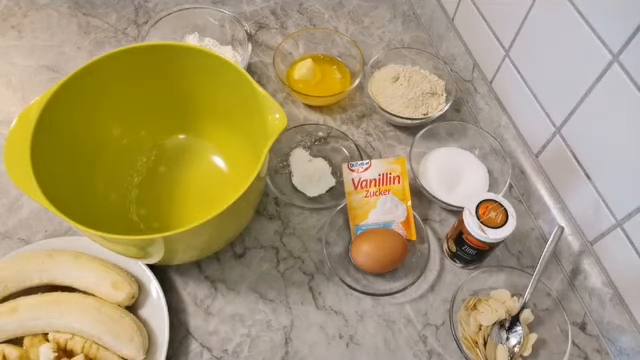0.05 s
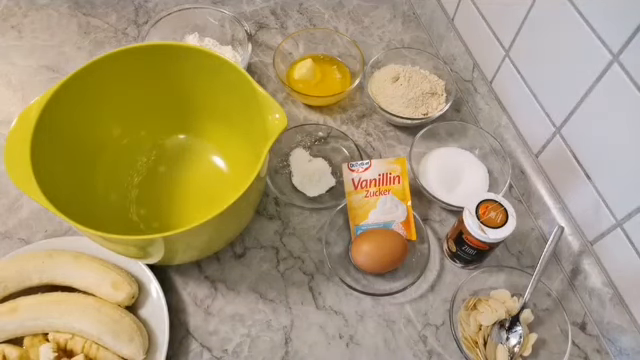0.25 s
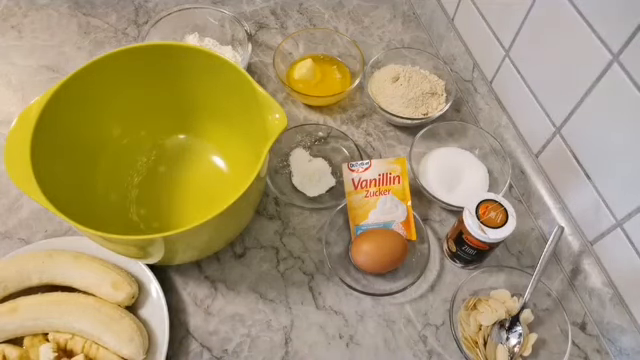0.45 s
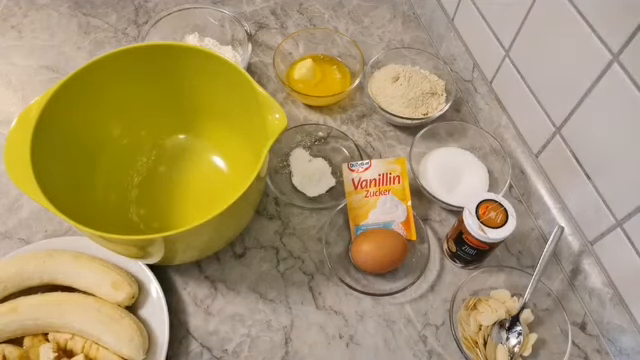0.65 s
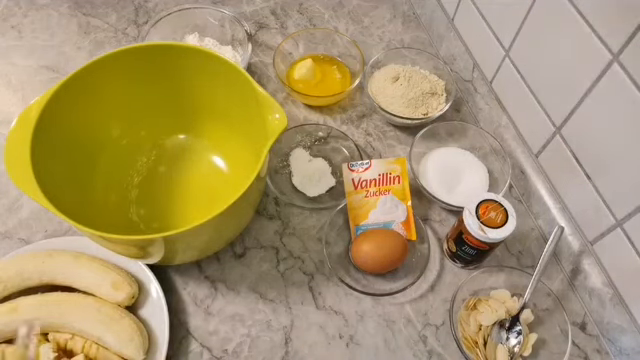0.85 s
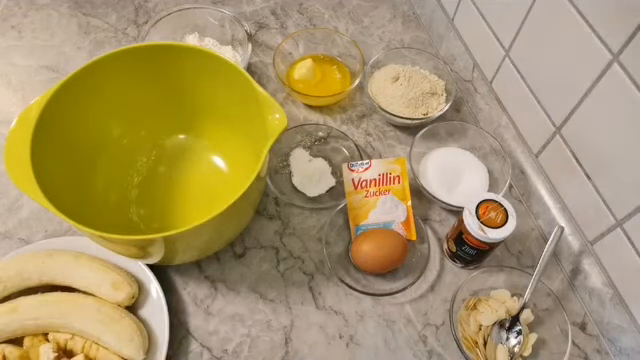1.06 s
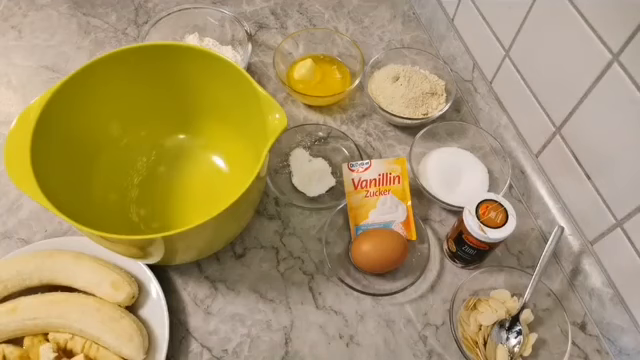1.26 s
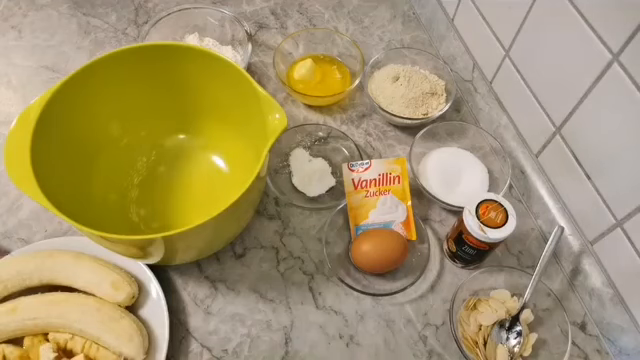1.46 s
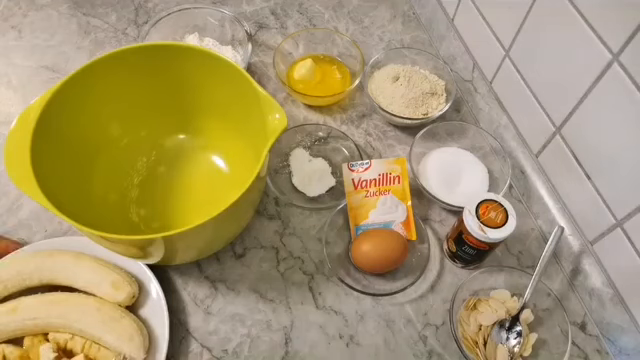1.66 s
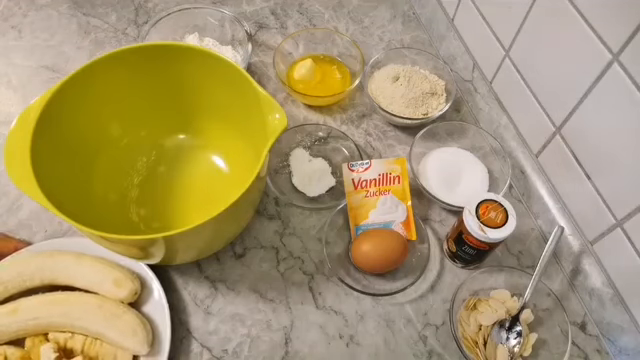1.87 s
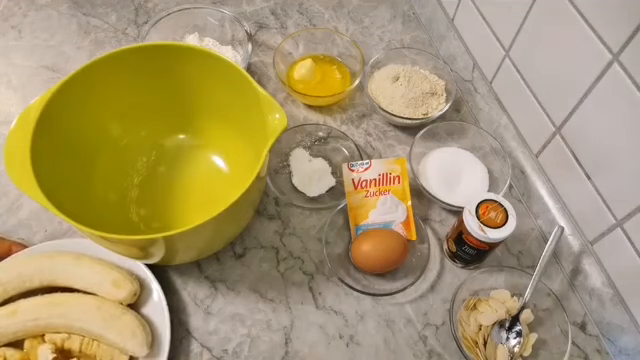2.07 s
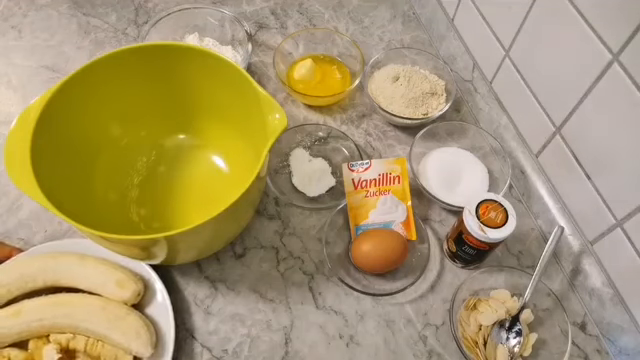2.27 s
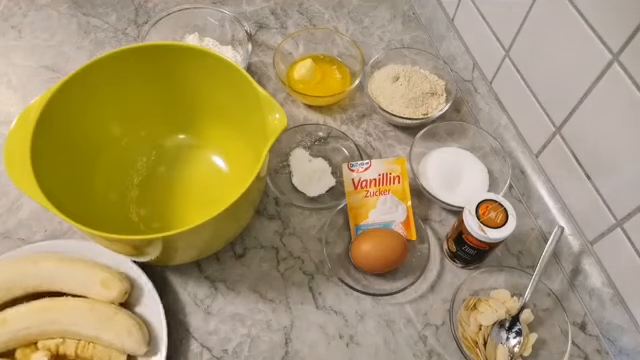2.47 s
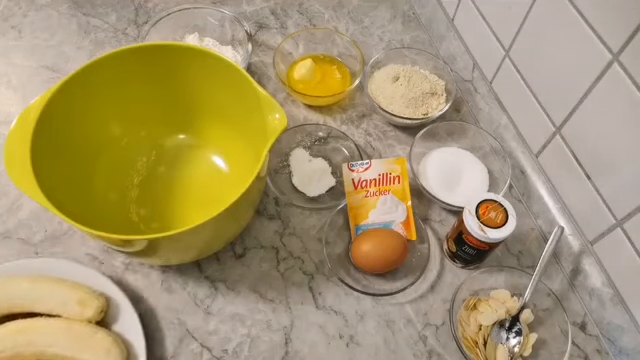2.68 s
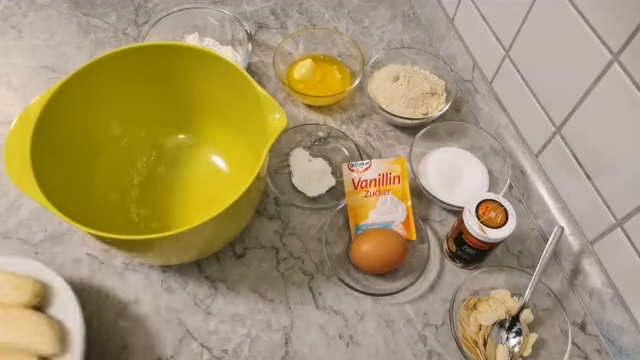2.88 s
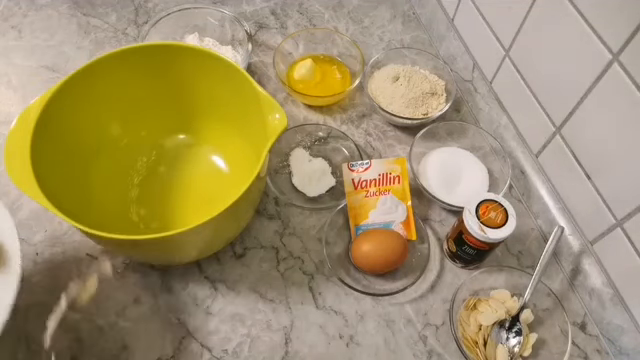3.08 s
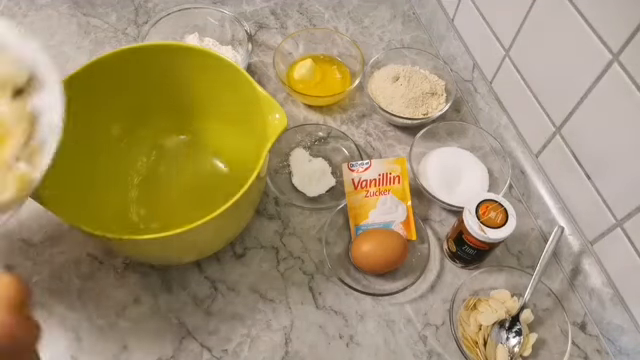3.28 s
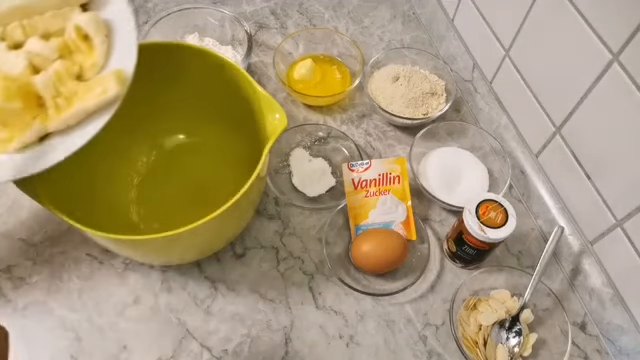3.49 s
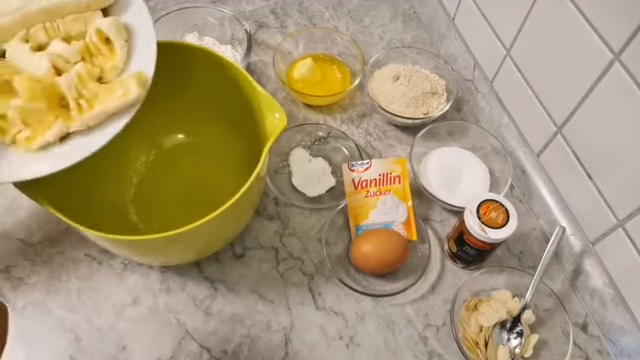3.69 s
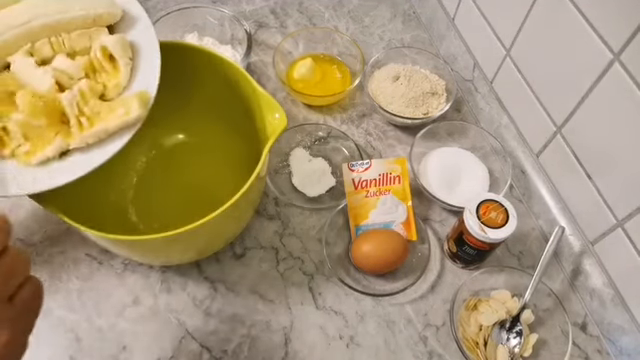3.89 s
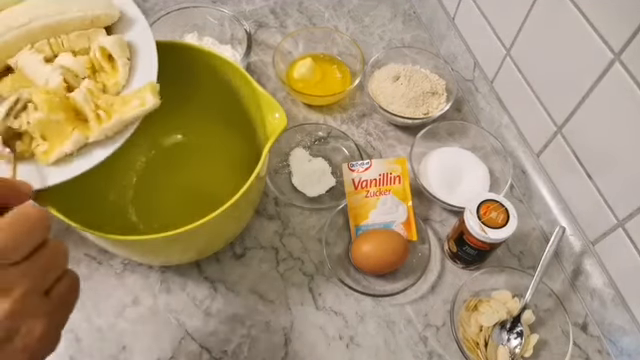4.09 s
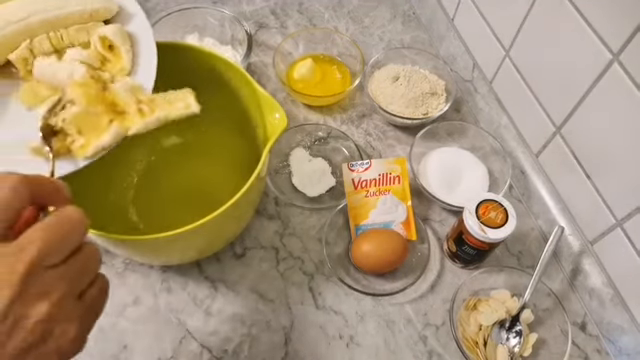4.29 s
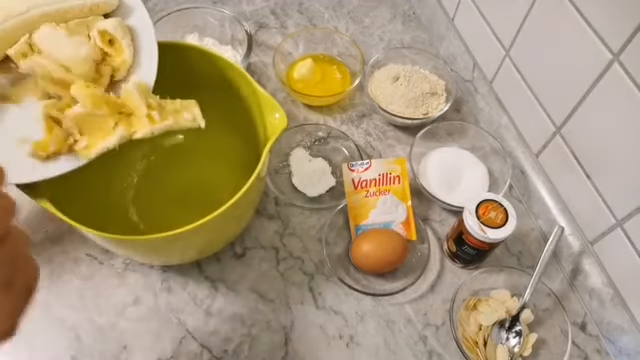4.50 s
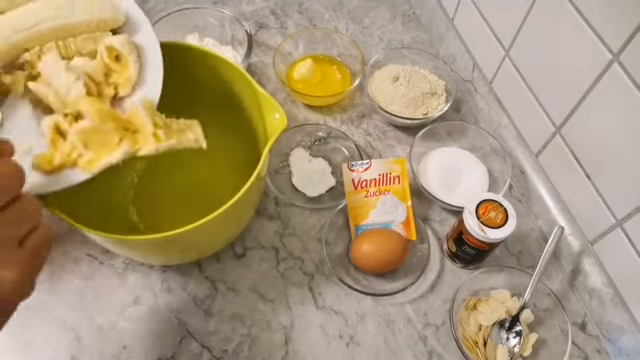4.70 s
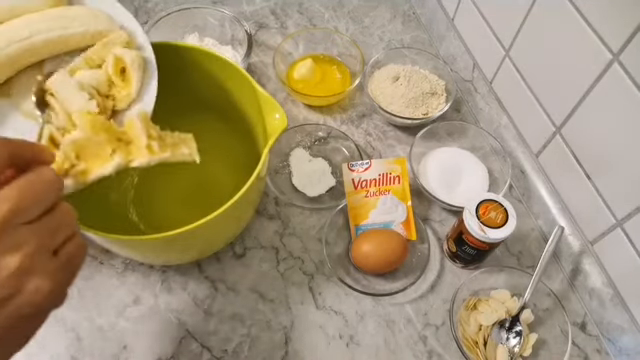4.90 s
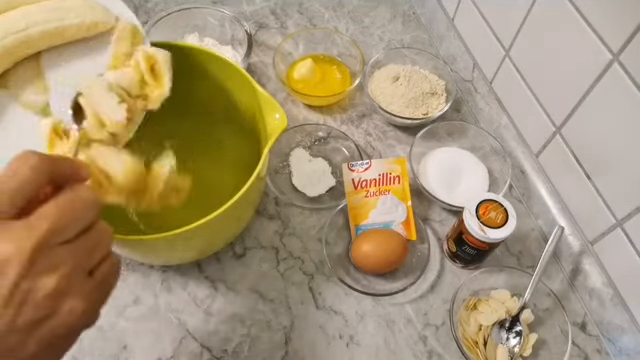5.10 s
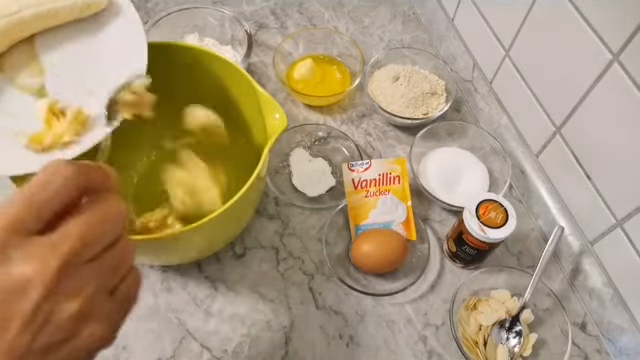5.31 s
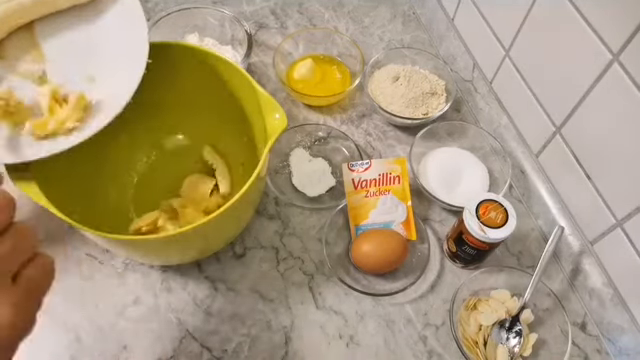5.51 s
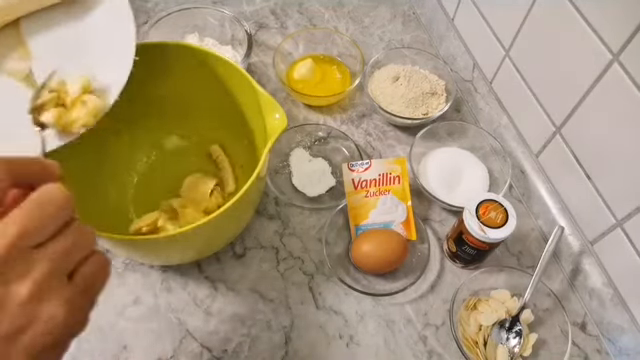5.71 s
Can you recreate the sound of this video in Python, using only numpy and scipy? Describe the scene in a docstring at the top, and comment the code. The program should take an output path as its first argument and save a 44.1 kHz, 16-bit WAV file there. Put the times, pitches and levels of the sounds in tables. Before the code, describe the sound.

In a quiet kitchen, hands brush a plate with faint dry rubbing and dull bumps. The plate then grates and knocks briefly over a stone counter and is lifted. After a near-silent gap come small sticky ticks of mashed banana, then a few close thuds into a hollow plastic bowl with a light fork tap. Close microphone, faint hiss, low rumble and weak hum, short room tail.

```python
"""Plate sliding and bumping on a stone counter, wet fork ticks and lumps thudding into a bowl in a quiet kitchen.
Rubbing is random stick-slip noise that excites the plate's modes; bumps are damped sines with a noise puff.
Sticky mashed banana lets go in short noise bursts. Each lump drives the modes of a plastic bowl with a force pulse.
A short room tail follows, over shaped noise for air and rumble, and an appliance hum of wavering tones.
"""
import sys
import numpy as np
from scipy import signal
from scipy.fft import rfft, irfft, next_fast_len
from scipy.io import wavfile
from scipy.ndimage import uniform_filter1d

SR = 44100
rng = np.random.default_rng(int(sys.argv[2]) if len(sys.argv) > 2 else 0)


def waveform_to_disk(signal):
    """Save audio, clipped to [-1, 1], as 16-bit WAV at the path in sys.argv[1]."""
    frames = np.transpose(np.atleast_2d(signal))
    scaled = np.clip(frames, -1, 1) * 32767
    samples = np.round(scaled).astype(np.int16)
    wavfile.write(sys.argv[1], SR, samples)


N = 253352  # length in samples

# Hands brushing the plate. Each row: start of full drive in seconds, rise, hold and fall in seconds,
# drive in dB, then counter boom, body and hiss in dB over the drive.
HAND_STROKES = [(0.01, 0.14, 0.045, .12, -77.5, 23, 7.5, 0.5), (0.12, .1, 0.015, 0.14, -75, -2, -1, 2),
                (0.29, 0.11, 0.036, 0.091, -76, -6, -17, 7.5),
                (0.335, 0.015, .015, 0.1, -77.5, 16, 13.5, 3),
                (0.7, 0.34, 0.073, 0.34, -70, -2.5, -4, -1.5), (0.9, 0.15, 0.11, 0.27, -69.5, -6, -21, 3),
                (1.065, 0.11, 0.068, 0.073, -55, -13, -2, -3),
                (1.225, 0.084, 0.072, 0.074, -54.5, -25, -7, -2.5),
                (1.42, 0.017, 0.014, 0.091, -81, 20, 19, -4), (1.5, 0.093, 0.012, 0.094, -68, 7, -5.5, 3.5),
                (1.577, .008, 0.0063, 0.095, -64, 11, 5.5, -7),
                (1.65, 0.042, 0.052, 0.044, -64.5, -12, -4, 2),
                (1.762, 0.0072, 0.011, 0.15, -55, -6, 2.5, -2.5),
                (1.83, 0.06, 0.05, 0.042, -66.5, 13, 3.5, 3.5), (2.0, 0.027, 0.015, 0.04, -72, -14, -1, 3)]


def hand_strokes():
    """Soft friction: hands brush the plate in many small slips."""
    return rub(*played(HAND_STROKES), plate_db=-8.0, per_s=3000, rasp_db=-3.5, spread_db=-1.0,
               chatter_db=0.88, damped=1.0)


# The plate's foot dragged over stone. Each row: start of full drive in seconds, rise, hold and fall in seconds,
# drive in dB, then counter boom, body and hiss in dB over the drive.
FOOT_DRAGS = [(2.17, 0.053, 0.021, .03, -68, 5, 12.3, -10),
              (2.203, 0.0072, 0.005, 0.037, -58.5, 5.5, 15, -18),
              (2.256, 0.062, 0.032, 0.097, -56, -6, 3.6, -21),
              (2.424, 0.027, 0.011, 0.061, -65.5, 4, 5.6, -7),
              (2.488, 0.024, 0.016, 0.067, -80.5, 19, 20.6, -7),
              (2.58, 0.037, 0.015, 0.06, -75, 13, 6.7, -8),
              (2.69, 0.11, 0.033, 0.054, -47.5, -5, 6.1, -10.5), (2.846, 0.023, .01, .15, -73, 10, 10, -8)]


def foot_drags():
    """Hard friction: the foot grates over stone in fewer slips, all of one size."""
    return rub(*played(FOOT_DRAGS), plate_db=-2.0, per_s=1500, rasp_db=-9.0, spread_db=0.0,
               chatter_db=1.5, damped=1.0)


# Modes of the plate: frequencies in Hz; then each row: relative level in dB, undamped T60 in seconds.
PLATE_HZ = [345, 440, 1180, 1432, 1960, 2250, 2410, 3500, 4570, 5850, 6650, 7050]
PLATE_MODES = [(9.5, 0.13), (2.5, 0.57), (-2, 0.18), (-10, 0.098), (-6, 0.12), (-6.5, 0.065), (-1.5, 0.047),
               (-1.5, 0.11), (3.5, 0.047), (-2, .03), (-3, 0.075), (2.5, 0.053)]
# Spectra of rasp, hiss, counter boom and body. Each row: frequency in Hz, relative level in dB per Hz.
RASP_COLOUR = [(410, -55), (700, 1), (818, -0.5), (1140, 2), (1280, 2), (2250, 7), (3030, -2), (5000, -21),
               (6500, -83), (11000, -120)]
HISS_COLOUR = [(1940, 6), (3300, -1.5), (4680, 2.5), (5380, 1), (7010, 0.5), (7840, -3.5), (13200, -3.5),
               (16000, -15)]
BOOM_COLOUR = [(55, -32), (80, 4), (110, 4), (170, -0.5), (220, -17), (300, -82)]
BODY_COLOUR = [(110, -65), (190, -3.5), (215, -6.5), (436, -6.5), (487, -8.5), (762, -12), (1100, -31.5),
               (1430, -23.5), (2420, -120)]
CHATTER_PER_S = 70  # how fast a rubbing contact catches and lets go
RING_GROWTH = 0.38  # exponent: harder pressure wakes the plate's ring more than in proportion


def rub(drive, boom, body, hiss, plate_db, per_s, rasp_db, spread_db, chatter_db, damped):
    """Stick-slip: uneven catches release slips that rasp, ring the held plate, boom, shake the body and hiss."""
    catches = uniform_filter1d(rng.standard_normal(N), int(SR / CHATTER_PER_S))
    chatter = gain_of(chatter_db * evened(catches))
    slips = chatter * grit(per_s, spread_db)
    rasp = gain_of(rasp_db) * coloured(slips, RASP_COLOUR)
    ringing = signal.oaconvolve(slips, ring(PLATE_HZ, PLATE_MODES, damped))[:N]
    plate = evened(above(ringing, 254))
    pressure = (drive / drive.max()) ** RING_GROWTH
    sound = drive * (rasp + gain_of(plate_db) * pressure * plate)
    fine_slips = chatter * grit(per_s=6900, spread_db=2.5)
    sound += hiss * coloured(fine_slips, HISS_COLOUR)
    return sound + boom * coloured(slips, BOOM_COLOUR) + body * coloured(slips, BODY_COLOUR)


# Soft bumps on the counter. Each row: start in seconds, level in dB, mode in Hz, T60 in seconds,
# noisy puff in dB relative to the mode.
COUNTER_BUMPS = [(0.024, -36, 142.5, 0.11, -35), (0.333, -42.5, 124, 0.097, -12),
                 (1.418, -32, 177.6, 0.072, -18.5), (1.576, -36.5, 338, 0.045, -24),
                 (1.762, -41, 186, 0.12, -12), (2.203, -35, 329, 0.076, -2.5),
                 (2.422, -37, 178, 0.06, -7.5), (2.484, -45.5, 152, 0.092, -5), (2.56, -46, 464, 0.12, -18),
                 (2.646, -28.5, 343, 0.064, -30), (2.681, -31.5, 441, 0.14, -13),
                 (2.844, -44, 462, 0.096, -15)]


def counter_bumps():
    """Damped resonance: each soft bump rings one dull mode, with a puff of noise."""
    out = np.zeros(N)
    t = np.arange(SR // 5) / SR
    noises = rng.standard_normal((len(COUNTER_BUMPS), len(t)))
    for (s, db, hz, t60, puff_db), noise in zip(COUNTER_BUMPS, noises):
        mode = np.sin(2 * np.pi * hz * t) * (1 - np.exp(-t * hz / 1.56))  # builds over 1.56 periods
        puff = gain_of(puff_db) * coloured(noise, BODY_COLOUR)
        envelope = gain_of(db - 60 * t / t60) * (1 - np.exp(-t / 0.0023))
        add(out, s, envelope * (mode + puff))
    return out


# The plate set back down: start in seconds, drive in dB.
PLATE_TAP = (2.8442, -63)
TAP_CONTACT_S = 0.00036  # a soft landing leaves the plate's highest modes asleep


def plate_tap():
    """Impact of finite contact time: a smooth pulse filters what reaches the plate's upper modes."""
    out = np.zeros(N)
    contact = np.hanning(int(TAP_CONTACT_S * SR))
    tap = signal.oaconvolve(ring(PLATE_HZ, PLATE_MODES, damped=0.46), contact)
    s, db = PLATE_TAP
    add(out, s, gain_of(db) * above(above(tap, 2300), 2300))
    return out


# Modes of the fork: frequencies in Hz; then each row: relative level in dB, T60 in seconds.
FORK_HZ = [2256, 2350, 2445, 2760, 2876, 2975, 3090, 4860]
FORK_MODES = [(-4.5, 0.083), (-4.5, 0.13), (-0.5, 0.047), (-19, 0.021), (5.5, 0.027), (-4, 0.051),
              (-10, .025), (-8, 0.028)]
# Taps of the fork. Each row: start in seconds, drive in dB.
FORK_TAPS = [(5.2455, -63), (5.3831, -38), (5.4263, -49)]


def fork_taps():
    """Modal ringing: each tap sets the fork's modes sounding with a softened onset."""
    out = np.zeros(N)
    fork = ring(FORK_HZ, FORK_MODES)
    onset = 1 - np.exp(-np.arange(len(fork)) / SR / 0.0017)
    for s, db in FORK_TAPS:
        add(out, s, gain_of(db) * fork * onset)
    return out


# Wet ticks. Each row: start in seconds, drive in dB, centre of the colour in Hz, its half-width in octaves.
WET_TICKS = [(1.049, -38.5, 7900, 1.5), (1.5748, -55, 6900, 0.96), (1.8228, -44, 11300, 0.63),
             (1.9081, -38, 7160, 0.99), (1.956, -57, 8960, 0.85), (2.0018, -50.5, 11300, 1.1),
             (2.1026, -51, 9050, 1), (2.148, -52, 13200, 1.7), (2.178, -35, 9000, 1.6),
             (2.4379, -50, 8850, 0.3), (2.4977, -51, 14400, 0.44), (3.32, -59.5, 6200, 1.4),
             (3.8127, -54.5, 14300, 1.3), (3.975, -55.5, 6500, 0.94), (4.0534, -42.5, 14000, 0.5),
             (4.0744, -53, 6900, 0.64), (4.136, -47, 14200, 1.2), (4.1574, -51, 10900, 0.39),
             (4.1874, -46, 10600, 0.34), (4.34, -47, 7500, 1.4), (4.4069, -52, 10900, 1.4),
             (4.4927, -49, 14400, 2.2), (4.8923, -43, 13800, 1.1), (4.9533, -53.5, 9480, 1.3),
             (5.0035, -55, 10800, 0.47), (5.0225, -41.5, 10600, 0.67), (5.214, -60, 6850, 0.43),
             (5.4296, -37.5, 5050, 1.2)]
# Spectrum of the fine fizz. Each row: frequency in Hz, relative level in dB per Hz.
FIZZ_COLOUR = [(4710, -35), (8000, -5.5), (10800, -1), (14500, -0.5), (16000, -2)]
TICK_T60_S = 0.033  # T60 of the fizz after the snap
# Faint stray ticks all through: mean rate, drive, spread of size.
STRAY_PER_S, STRAY_DB, STRAY_SPREAD_DB = 12, -76, 3


def wet_ticks():
    """Adhesive release: single bonds of pulp break in a snap, then a longer fizz, among faint stray ticks."""
    out = np.zeros(N)
    t = np.arange(SR // 8) / SR
    snap = gain_of(-60 * t / 0.0085)
    fizz = gain_of(-4.5 - 60 * t / TICK_T60_S)
    shape = (1 - np.exp(-t / 0.00078)) * (snap + fizz)
    f = np.geomspace(1200, 17000, num=24)
    for (s, db, hz, width), noise in zip(WET_TICKS, rng.standard_normal((len(WET_TICKS), len(t)))):
        octaves = np.log2(f / hz)
        colour = np.c_[f, np.maximum(-12 * (octaves / width) ** 2, -40)]
        add(out, s, gain_of(db) * shape * coloured(noise, colour))
    strays = signal.oaconvolve(grit(STRAY_PER_S, STRAY_SPREAD_DB), shape)[:N]
    return out + gain_of(STRAY_DB) * strays * coloured(rng.standard_normal(N), FIZZ_COLOUR)


# Runs of sticky crackle. Each row: start of full level in seconds, rise, hold and fall in seconds,
# level in dB, fine fizz in dB over it.
CRACKLE_RUNS = [(1.908, 0.014, .003, 0.035, -59.5, 0), (2.104, 0.0069, 0.0025, 0.015, -61.5, -13),
                (2.165, 0.046, 0.015, 0.028, -65.5, 6), (4.055, 0.05, 0.022, 0.096, -70.5, 3.5),
                (4.138, 0.013, 0.04, 0.047, -61, -3), (4.345, 0.092, .005, 0.024, -66.5, 3.5),
                (4.42, 0.036, 0.024, 0.069, -63, 1), (4.5, 0.042, 0.017, 0.037, -69.5, 6.5),
                (4.893, .01, 0.03, 0.38, -69.5, 2.5), (5.1, 0.0068, .005, .05, -64.5, 0.5),
                (5.262, 0.021, 0.0069, 0.041, -57.5, 3), (5.384, 0.0047, 0.0044, 0.053, -53.5, -3.5),
                (5.426, 0.015, 0.0039, 0.019, -62, 4)]
# Spectrum of the crackle. Each row: frequency in Hz, relative level in dB per Hz.
WET_COLOUR = [(1060, -44), (1800, -18), (2160, 0), (3260, 3.5), (7240, 7.5), (8000, -3), (10400, -14),
              (17600, -120)]


def sticky_crackle():
    """Crackling noise: many small random releases of pulp, with denser and finer fizz."""
    crackle, fizz = played(CRACKLE_RUNS)
    coarse = crackle * coloured(grit(per_s=6000, spread_db=4.0), WET_COLOUR)
    return coarse + fizz * coloured(grit(per_s=34000, spread_db=0.0), FIZZ_COLOUR)


# Modes of the bowl: the wall sings, the base thumps on the counter, the loaded bowl rocks on.
# Frequencies in Hz; then each row: relative level in dB, T60 in seconds (undamped for wall and base).
WALL_HZ = [457, 523, 584, 638, 733, 849, 980, 1027, 1180, 1378, 1435, 2164]
WALL_MODES = [(-7.5, 0.174), (0.5, 0.14), (-9, 0.21), (-24, 0.11), (-23, .09), (-13, 0.043), (-13, 0.049),
              (-30, 0.096), (-25, .05), (-18.5, 0.16), (-21, 0.06), (-15, 0.21)]
BASE_HZ = [64, 129, 152, 197, 280, 348]
BASE_MODES = [(-4.5, 0.52), (-11.5, 0.6), (-4.5, 0.12), (-3.5, 0.14), (11.5, 0.012), (5, 0.15)]
SWAY_HZ = [176.6, 200]
SWAY_MODES = [(-1, 0.72), (-18, 0.97)]
SWAY_WAVER = 0.31  # depth of the uneven part of the rocking
# Spectra of splat and settling pulp. Each row: frequency in Hz, relative level in dB per Hz.
SPLAT_COLOUR = [(600, 15), (1100, 3.5), (2200, -3.5), (3000, -8.5), (4000, -6.5), (5000, -0.5), (6000, -19),
                (16000, -28)]
SLUMP_COLOUR = [(60, -15), (110, 7.5), (350, 4.5), (650, 0.5), (850, -27), (1100, -59)]
# Lumps landing. Each row: first touch in seconds, delay of the main push in ms, its contact time in ms,
# drive of wall, base and sway in dB, share of ring time left by the pulp, splat in dB, slump in dB.
LUMPS = [(5.098, 3.33, 1.12, -14.5, -39.5, -64, 1, -44, -50),
         (5.2443, 2.17, 3.38, -22, -36, -52, 0.76, -56.5, -47),
         (5.3812, 3.25, 1.73, -23.5, -32, -42, 0.71, -50, -34.5),
         (5.428, 3.5, 2, -49, -43, -40.5, 0.86, -49.5, -53)]


def bowl():
    """Forced modal vibration: a lump touches, dents the bowl away, then pushes; soft pushes wake only low modes."""
    out = np.zeros(N)
    t = np.arange(SR // 4) / SR
    ms = t[:500] * 1e3
    for row, noise in zip(LUMPS, rng.standard_normal((len(LUMPS), len(t)))):
        s, lag, contact, wall_db, base_db, sway_db, damped, splat_db, slump_db = row
        push = np.sin(np.pi * np.clip((ms - lag) / contact, 0, 1)) ** 2
        touch = np.sin(np.pi * np.clip(ms / (0.89 * contact), 0, 1)) ** 2
        dent = np.sin(np.pi * np.clip(ms / lag, 0, 1))
        force = push / push.sum() - 0.5 * dent / dent.sum() - 0.2 * touch / touch.sum()
        drift = uniform_filter1d(uniform_filter1d(np.tile(noise, 2), size=900), size=900)
        uneven = 1 + SWAY_WAVER * evened(drift)
        wall = gain_of(wall_db) * above(ring(WALL_HZ, WALL_MODES, damped), 446)
        base = gain_of(base_db) * ring(BASE_HZ, BASE_MODES, damped)
        sway = gain_of(sway_db) * uneven * ring(SWAY_HZ, SWAY_MODES)
        add(out, s, signal.oaconvolve(wall + base + sway, force))
        add(out, s, gain_of(splat_db - 60 * t / 0.11) * coloured(noise, SPLAT_COLOUR))
        slump = gain_of(slump_db - 60 * t / 0.22) * (1 - np.exp(-t / 0.0014))
        add(out, s, slump * coloured(noise, SLUMP_COLOUR))
    return out


KITCHEN_T60_S, KITCHEN_DB = 0.21, -8  # decay and level of the room tail


def kitchen(x):
    """Reverberation: a tiled room answers with an exponentially decaying noise tail."""
    t = np.arange(SR // 3) / SR
    tail = rng.standard_normal(len(t)) * gain_of(-60 * t / KITCHEN_T60_S) * (t > 0.004)
    tail = above(tail, 620)
    return signal.oaconvolve(x, tail / np.linalg.norm(tail))[:N]


# Level of the rumble over time. Each row: time in seconds, level in dB.
RUMBLE_LEVEL = [(0.0, -57.5), (0.57, -58), (0.73, -62.5), (1.69, -61.5), (2.0, -66), (2.14, -62.5),
                (2.72, -61), (3.12, -62.5), (4.11, -65), (4.66, -54.5), (4.84, -64), (5.3, -58.5),
                (5.39, -54), (5.55, -58), (5.74, -62)]
# Spectrum of the rumble. Each row: frequency in Hz, relative level in dB per Hz.
RUMBLE_COLOUR = [(7.1, -86), (12, 5.5), (27, -10.5), (47, -4), (72, -6.5), (86, -51), (102, -15),
                 (130, -29), (170, -22), (290, -120)]


def rumble():
    """Amplitude-modulated noise: deep rumble whose level wanders."""
    level_db = np.interp(np.arange(N) / SR, *np.transpose(RUMBLE_LEVEL))
    return gain_of(level_db) * coloured(rng.standard_normal(N), RUMBLE_COLOUR)


# Appliance hum. Each row: frequency in Hz, width in Hz, level in dB.
HUM_TONES = [(151, 6.8, -79.5), (776, 27, -80), (899, 15.5, -80)]


def appliance_hum():
    """Narrow-band tones: an appliance hums in a few wavering partials."""
    return sum(gain_of(db) * wavering(hz, width) for hz, width, db in HUM_TONES)


# A thin faint tone near the end: rise (and fall) in seconds, hold in seconds, level in dB, width in Hz.
LATE_TONE = (.1, .1, -83, 25)
LATE_TONE_S, LATE_TONE_HZ = 5.66, 1915  # start of full level, pitch


def late_tone():
    """Narrow-band tone: one thin wavering pitch swells at the end."""
    rise, hold, db, width = LATE_TONE
    return played([(LATE_TONE_S, rise, hold, rise, db)])[0] * wavering(LATE_TONE_HZ, width)


# Spectra of still air and microphone hiss. Each row: frequency in Hz, relative level in dB per Hz.
AIR_COLOUR = [(53, -22), (90, -14), (144, 1.5), (174, -5), (465, -6.5), (555, -9), (755, -9.5), (813, -18),
              (875, -7), (955, -14), (3000, -14.5), (3900, -85), (6600, -120)]
MIC_COLOUR = [(2400, -59), (3000, -0.5), (6300, 1.5), (7200, 6), (7900, 0.5), (8300, -1.5), (10400, -1),
              (12500, 0), (13500, 4.5), (14800, -0.5), (15100, -5), (16200, 10)]
AIR_DB, MIC_DB = -73, -71.5  # overall levels


def still_air():
    """Stationary noise: still air, and microphone hiss with faint random pricks."""
    air = gain_of(AIR_DB) * coloured(rng.standard_normal(N), AIR_COLOUR)
    pricks = gain_of(12.5) * grit(per_s=550, spread_db=2.0)
    return air + gain_of(MIC_DB) * coloured(rng.standard_normal(N) + pricks, MIC_COLOUR)


def gain_of(db):
    """Level law: decibels to amplitude."""
    return 10 ** (np.asarray(db) / 20)


def evened(x):
    """Normalization: scales x to rms 1."""
    return x / np.sqrt(np.mean(x ** 2) + 1e-20)


def add(mix, s, sound):
    """Superposition: mixes a sound in at s seconds."""
    part = mix[round(s * SR):][:len(sound)]
    part += sound[:len(part)]


def coloured(x, points):
    """Spectral shaping: filters x through (Hz, dB) points, -90 dB outside their ends, to rms 1."""
    hz, db = np.transpose(points)
    size = next_fast_len(len(x))
    f = np.fft.rfftfreq(size, 1 / SR)
    gain = gain_of(np.interp(np.log(f + 1), np.log(hz), db, -90, -90))
    return evened(irfft(rfft(x, size) * gain, size)[:len(x)])


EDGE_DB = -20.0  # a stroke climbs this far in its rise time and sinks this far in its fall time


def played(rows):
    """Exponential envelopes: the summed level of all strokes, then that of each part riding on it."""
    s, rise, hold, fall, db, *over_db = np.transpose(rows)[..., None]
    t = np.arange(0, N + 64, 32) / SR
    before = np.maximum(s - t, 0) / rise
    after = np.maximum(t - s - hold, 0) / fall
    shape = gain_of(db + EDGE_DB * (before + after))
    seconds = np.arange(N) / SR
    return [np.interp(seconds, t, (shape * gain_of(part_db)).sum(0)) for part_db in [0, *over_db]]


def grit(per_s, spread_db):
    """Random impulse process: slips at a mean rate, their sizes spread by a capped exponential draw."""
    happens = rng.random(N) < per_s / SR
    size = gain_of(spread_db * np.minimum(rng.exponential(1, N), 4))
    return happens * size * rng.standard_normal(N)


def ring(hzs, modes, damped=1):
    """Modal superposition: impulse response of decaying sines, T60 scaled by damped."""
    t = np.arange(SR // 2) / SR
    return sum(gain_of(db - 60 * t / (t60 * damped)) * np.sin(2 * np.pi * hz * t)
               for hz, (db, t60) in zip(hzs, modes))


def above(x, hz):
    """High-pass filtering, second order."""
    return signal.lfilter(*signal.butter(2, hz, "high", fs=SR), x)


def wavering(hz, width):
    """Random modulation: a steady carrier plus narrow complex noise around it, to rms 1."""
    r = np.exp(-np.pi * width / SR)
    noise = rng.standard_normal(N) + 1j * rng.standard_normal(N)
    waver = signal.lfilter([1], [1, -r], noise)
    phasor = 1.75 + evened(waver.real) + 1j * evened(waver.imag)
    return evened((phasor * np.exp(2j * np.pi * hz * np.arange(N) / SR)).real)


def scene():
    """Superposition: all handling shares the room tail; the deep bass of the near sounds is thinned."""
    plate = hand_strokes() + foot_drags() + counter_bumps() + plate_tap()
    food = fork_taps() + wet_ticks() + sticky_crackle() + bowl()
    near = above(plate + food, 57)
    background = rumble() + appliance_hum() + late_tone() + still_air()
    return (near + gain_of(KITCHEN_DB) * kitchen(near) + background)[None]


BAND_EDGE_HZ = 15790


def record(dry):
    """Band limiting: a linear-phase low-pass closes the top of the spectrum."""
    lowpass = signal.firwin(511, BAND_EDGE_HZ, window=("kaiser", 9), fs=SR)
    return signal.oaconvolve(dry, lowpass[None], "same")


dry = scene()
out = record(dry)
waveform_to_disk(out)
```